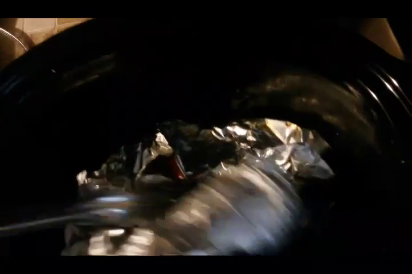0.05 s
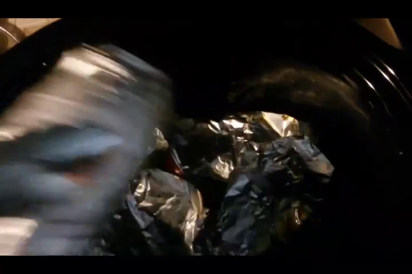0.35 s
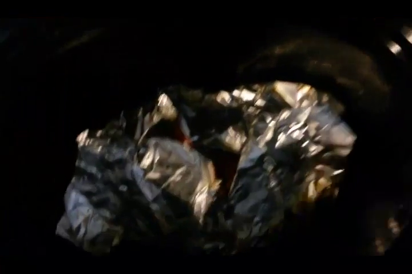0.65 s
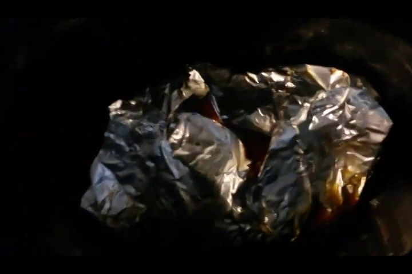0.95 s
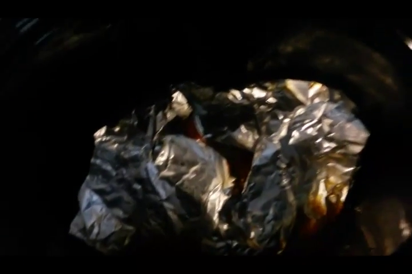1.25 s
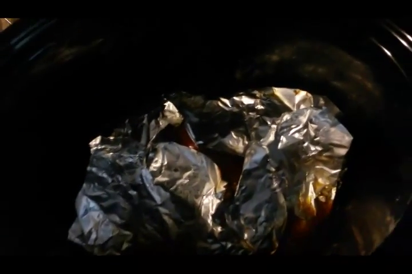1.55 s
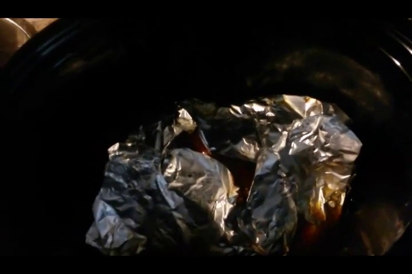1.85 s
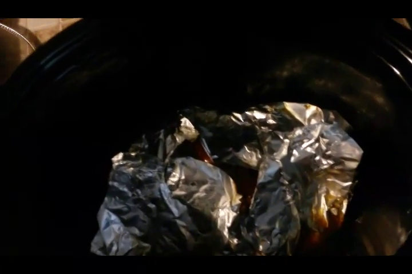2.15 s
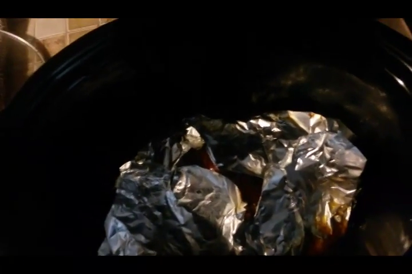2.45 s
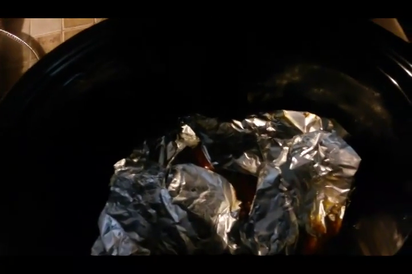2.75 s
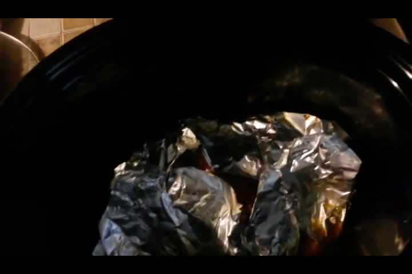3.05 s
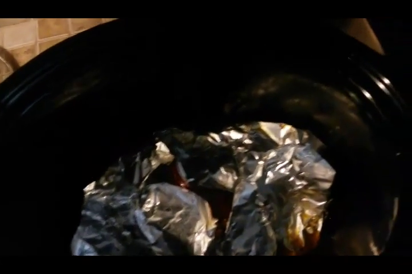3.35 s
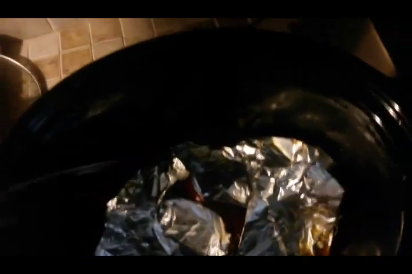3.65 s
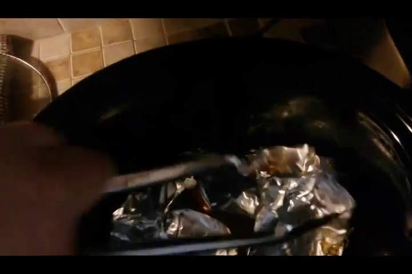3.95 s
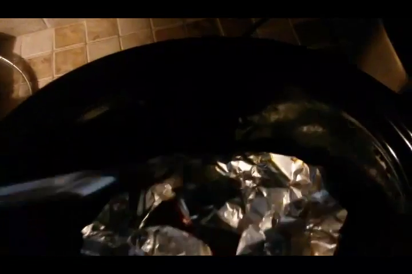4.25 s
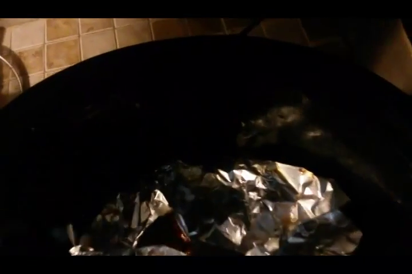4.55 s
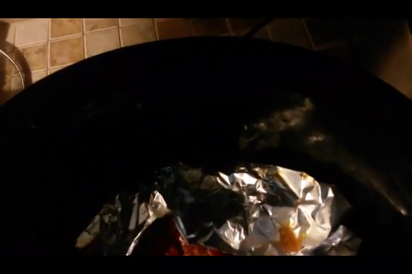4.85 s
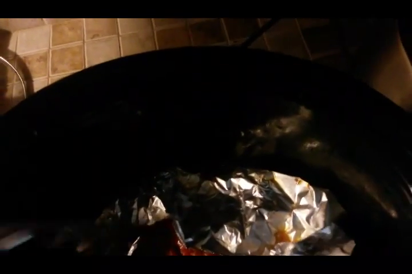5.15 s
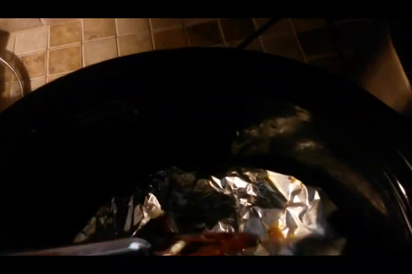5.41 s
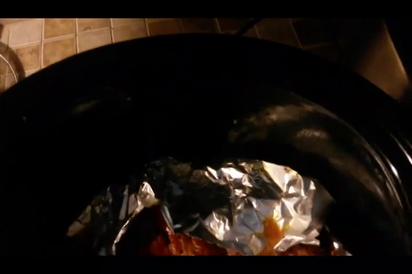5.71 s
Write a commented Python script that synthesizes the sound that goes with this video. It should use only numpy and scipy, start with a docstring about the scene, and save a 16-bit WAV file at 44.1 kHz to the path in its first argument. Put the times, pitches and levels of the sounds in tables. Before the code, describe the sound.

Close, crisp crackles of foil pushed by metal tongs come in bursts over faint bubbling and a low motor hum.

```python
"""Foil potatoes in a slow cooker

Metal tongs shift foil-wrapped potatoes: the foil buckles in thousands of tiny clicks that make short
rustles, snaps and hollow crunches. Juice simmers and spits faintly in the crock, which takes a dull
knock just after a much fainter one; a motor hums in the kitchen. The microphones are close over
the pot, the left one dull, the right one very bright."""
import sys
import numpy as np
from scipy import signal
from scipy.fft import rfft, irfft, next_fast_len
from scipy.io import wavfile
from scipy.ndimage import uniform_filter1d, minimum_filter1d, map_coordinates

SR = 44100
rng = np.random.default_rng(int(sys.argv[2]) if len(sys.argv) > 2 else 0)


def to_wav(s):
    """Save 16-bit WAV."""
    ch = np.atleast_2d(s).T  # columns
    pcm = np.round(np.clip(ch, -1, 1) * 32767)  # PCM
    wavfile.write(sys.argv[1], SR, pcm.astype(np.int16))


N = 263621

# the foil's three voices (fine creases, facets, the whole sheet): low_hz, high_hz
CREASE_HZ, FACET_HZ, SHEET_HZ = (7020, 14240), (2204, 5990), (704, 1980)

# shoves of the tongs: start_s, hold_s, level_db, facet_trim_db, sheet_trim_db
SHOVES = [(0, 0.065, -40.5, 0, -8), (0.131, 0.041, -29.5, -2.5, -14.5), (0.071, .2, -42.5, -2.5, -9),
          (.275, 0.092, -27.5, -7, -16.5), (.368, 0.019, -21, -13.5, -17.5), (0.59, .03, -37, -7, -14),
          (0.619, 0.019, -23, -8.5, -19), (1.188, 0.098, -35, -4, -26), (1.838, 0.04, -32.5, -1.5, -16),
          (3.332, 0.034, -19, -3, -43), (3.397, 0.059, -21, -11.5, -31), (4.191, 0.041, -39.5, -4.5, -16),
          (4.216, 0.034, -48, 2, 2.5), (4.245, 0.082, -23.5, -7.5, -15), (4.31, 0.094, -20, -10, -18),
          (4.824, .074, -31.5, -2.5, -11.5), (4.898, 0.088, -32, -9, -13.5), (5.122, 0.025, -40.5, -3, -9),
          (5.198, .056, -35.5, -9, -8.5), (5.502, 0.13, -38, -4.5, -10.5), (5.551, 0.03, -30.5, -5.5, -13),
          (5.636, 0.011, -32, -2.5, -8.5), (5.713, 0.014, -24, -12, -10), (5.752, 0.057, -23, -3.5, -8.5),
          (5.808, 0.15, -28.5, -6, -19.5)]
# gentle flexes of the foil: middle_s, half_width_s, level_db
FLEXES = [(1.42, 0.024, -43.5), (1.521, 0.028, -46.5), (1.645, 0.055, -44.5), (1.801, 0.046, -40),
          (1.91, .04, -48), (2.045, 0.041, -50), (2.13, 0.018, -38.5), (2.29, .04, -53), (2.41, 0.065, -38),
          (2.515, 0.042, -41.5), (2.675, 0.028, -40.5), (2.81, 0.044, -36), (2.95, 0.029, -35.5),
          (3.0, .025, -34), (3.149, 0.043, -35), (3.225, 0.022, -35), (3.314, 0.021, -33),
          (3.47, 0.035, -38), (5.171, 0.054, -46.5), (5.228, 0.02, -29.5)]
def foil_rustles(attack_s=0.0044, release_s=0.0075, settle_db=-19.5, settle_s=0.057):
    """A shove bites and lets go quickly, then the foil settles softly; a flex is one smooth swell."""
    out = np.zeros((2, N))
    t = np.arange(SR // 3) / SR
    for start_s, hold_s, level_db, facet_trim_db, sheet_trim_db in SHOVES:
        attack = np.minimum(t / attack_s, 1)
        after = np.maximum(t - hold_s, 0)
        fall = np.maximum(np.exp(-after / release_s), amp(settle_db) * np.exp(-after / settle_s))
        add(out, start_s, rustle(amp(level_db) * attack * fall, facet_trim_db, sheet_trim_db))
    t = np.arange(-SR // 6, SR // 6) / SR
    for middle_s, half_width_s, level_db in FLEXES:
        swell = amp(level_db) * np.exp(-0.5 * (t / half_width_s) ** 2)
        add(out, middle_s + t[0], rustle(swell, facet_trim_db=-3.5, sheet_trim_db=-16.5))
    return shifting_resonances(out)


def rustle(effort, facet_trim_db, sheet_trim_db, jerk_db=1.35, jerk_hz=90):
    """Foil gives way in small jerks: creases crackle, facets buckle and the sheet drags on the crock."""
    n = len(effort)
    creases = crackle(n, CREASE_HZ, per_s=3500, spread_db=2.9, cycles=0.8)
    facets = crackle(n, FACET_HZ, per_s=2200, spread_db=2.65, cycles=0.96)
    sheet = crackle(n, SHEET_HZ, per_s=1500, spread_db=2.5, cycles=0.42)
    foil = creases + amp(facet_trim_db - 2) * facets + amp(sheet_trim_db - 0.5) * sheet
    jerks = map_coordinates(rng.standard_normal(256), [np.arange(n) / SR * jerk_hz], mode="mirror")
    return foil * effort * amp(jerk_db * jerks)


def shifting_resonances(x, depth_db=2.5):
    """As foil changes shape its resonances come and go, in patches of about 600 Hz by 30 ms."""
    spectrum = signal.stft(x, nperseg=256)[2]
    patches = rng.standard_normal(spectrum.shape[1:])
    patches = uniform_filter1d(uniform_filter1d(patches, size=4, axis=0), size=11, axis=1)
    gain = amp(depth_db * patches / patches.std())
    gain /= np.sqrt(np.mean(gain ** 2))
    return signal.istft(spectrum * gain, nperseg=256)[1][:, :x.shape[1]]


# sharp snaps and faint ticks, the loud ones mostly brighter: start_s, level_db, body_db
SNAPS = [(.0034, -22, -3.5), (0.016, -20, -19), (0.1155, -15, -19), (0.2143, -25.5, -16),
         (0.2761, -10.5, -2), (.3745, -7, -27), (0.449, -17.5, -4), (0.507, -39.5, 5.5),
         (0.5901, -19.5, -9), (0.637, -14, -28), (0.8106, -35.5, -8), (1.3011, -15.5, -29),
         (1.47, -24, -29), (1.8414, -25, -8), (1.864, -19, -7.5), (1.8994, -20, -22), (2.0268, -33.5, 2),
         (2.1796, -24, 0), (2.311, -30, -17), (2.614, -28.5, -5.5), (2.891, -28.5, 0.5),
         (3.1403, -25, -0.5), (3.3307, -6, -6.5), (3.3494, -3, -28), (3.3995, 0, -15), (3.4495, -13, -12),
         (3.692, -35, -7), (3.9789, -46, 5.5), (4.2445, -19, -5), (4.2906, -12, -11), (4.3834, -23, -27),
         (4.4426, -22, -4), (4.826, -21, -3.5), (4.8825, -18, 2), (5.563, -13, -20), (5.6474, -12.5, -9),
         (5.7143, -12, -14), (5.7212, -14.5, -5), (5.7511, -4, -8.5), (5.7773, -10, -2.5), (5.794, -3, -28),
         (5.8048, -5.5, -23), (5.892, -22, -1)]
def foil_snaps(run_s=0.0008, lag_s=0.00086):
    """A fold gives way in an avalanche of eight buckles, a few milliseconds long."""
    out = np.zeros((2, N))
    for start_s, level_db, body_db in SNAPS:
        times = np.append(0, rng.exponential(run_s, 7))
        sizes = np.exp(-times / (2 * run_s))
        for band_hz, band_db in (CREASE_HZ, 0), (FACET_HZ, body_db - 2), (SHEET_HZ, body_db - 13):
            buckles = grains(SR // 16, times, sizes, band_hz, cycles=0.64)
            snap = in_pot(buckles[None], walls_db=0)
            add(out, start_s + lag_s, snap * amp(level_db + band_db) / np.abs(snap.mean(0)).max())
    return out


# hollow foil crunches and a few faint juice pops: start_s, level_db, pitch_hz, length_s
CRUNCHES_AND_POPS = [(0.274, -27.5, 1050, .006), (0.385, -30, 940, .008), (0.439, -37, 1550, 0.015),
                     (0.59, -29.5, 2890, .008), (0.617, -22.5, 2720, .025), (0.965, -42.5, 2370, .003),
                     (1.84, -29, 2990, 0.035), (2.612, -33.5, 2320, .004), (3.33, -13, 4870, .028),
                     (3.356, -20.5, 2580, .02), (3.402, -24.5, 2690, 0.05), (3.6, -42, 2460, .003),
                     (4.289, -10, 6650, .005), (4.341, -26.5, 980, .01), (4.573, -45.5, 2480, .004),
                     (4.871, -25, 3020, 0.014), (4.933, -24, 3040, 0.007), (5.129, -37, 1465, .025),
                     (5.625, -32.5, 1560, .027), (5.749, -23, 1730, .008), (5.939, -21, 7200, .005)]
def crunches_and_pops(pitch_spread=0.089, clicks_per_s=1500, trim_db=-1):
    """Clicks ring near one pitch: a taut foil panel crunching or, when tiny and faint, a juice pop."""
    out = np.zeros((2, N))
    for start_s, level_db, pitch_hz, length_s in CRUNCHES_AND_POPS:
        times = length_s * rng.random(int(clicks_per_s * length_s) + 1)
        band_hz = pitch_hz * (1 - pitch_spread), pitch_hz * (1 + pitch_spread)
        clicks = grains(SR // 8, times, np.ones(len(times)), band_hz, cycles=2.1, grain_samples=512)
        ring = in_pot(clicks[None])
        add(out, start_s, ring * amp(level_db + trim_db) / np.abs(ring.mean(0)).max())
    return out


# dull blows on the crock: start_s, level_db, cutoff_hz
KNOCKS = [(1.968, -39, 380), (2.323, -25.5, 1800)]
# modes of the loaded crock: pitch_hz, level_db, t60_s
CROCK_MODES = [(141.5, -6, 0.26), (288, 1, 0.11), (451, -2.5, 0.16), (610, -23, 0.06), (909, -6, 0.13),
               (1120, 1.5, 0.041), (1340, -6, 0.022)]
def crock_knocks(ring_db=-0.5, thud_db=-9, thud_t60_s=0.1):
    """A soft blow thuds and briefly rings the heavy crock; the softer the contact, the duller."""
    out, t = np.zeros((2, N)), np.arange(SR // 5) / SR
    for start_s, level_db, cutoff_hz in KNOCKS:
        modes = sum(amp(db - 60 * t / t60_s) * np.sin(2 * np.pi * (hz * t + rng.random()))
                    for hz, db, t60_s in CROCK_MODES)
        soften = signal.butter(5, [130, cutoff_hz], "band", fs=SR, output="sos")
        ring = signal.sosfilt(soften, modes)
        thud = unit_rms(signal.sosfilt(soften, rng.standard_normal((2, len(t)))))
        thud *= amp(thud_db - 60 * t / thud_t60_s)
        add(out, start_s, amp(level_db) * (amp(ring_db) * ring / np.abs(ring).max() + thud))
    return out


# the larger bubbles in the juice: start_s, level_db, pitch_hz
BUBBLES = [(0.575, -39, 550), (0.773, -42, 557), (1.046, -42, 590), (1.131, -40.5, 573), (1.753, -41, 1120),
           (2.765, -38, 574), (3.013, -33.5, 1160), (3.225, -35, 850), (3.841, -48, 541), (4.115, -47, 586),
           (4.518, -39, 620), (4.542, -41, 1080), (4.646, -44.5, 414), (5.336, -41, 654), (5.403, -41, 567)]
def juice_bubbles(life_s=0.0011, rise_per_s=12, tick_db=-2):
    """A bubble's skin bursts with a tick; the pocket under it plops, rising a little in pitch."""
    out, t = np.zeros((2, N)), np.arange(SR // 25) / SR
    envelope = t / life_s * np.exp(1 - t / life_s)
    for start_s, level_db, pitch_hz in BUBBLES:
        plop = envelope * np.sin(2 * np.pi * pitch_hz * t * (1 + rise_per_s * t / 2))
        burst = grains(len(t), np.zeros(1), np.ones(1), (1.7 * pitch_hz, 2 * pitch_hz), cycles=0.43)
        tick = in_pot(burst[None])
        add(out, start_s, amp(level_db) * (plop + amp(tick_db) * tick / np.abs(tick).max()))
    return out


# tone of the kitchen hiss: frequency_hz, gain_db
HISS_TONE = [(100, 16), (300, 14.5), (620, -2.5), (900, -1), (1400, -8.5), (2500, -12), (5000, -11.5),
             (10000, -22), (15000, -25)]
def simmer(hiss_db=-5, spit_db=-7, pop_db=-13, plop_db=-12):
    """Tiny spits, pops and plops from the hot juice, in a soft kitchen hiss."""
    hiss = unit_rms(microphones(shaped_noise(HISS_TONE)))
    spits = crackle(N, (3000, 14000), per_s=70, spread_db=4.6, cycles=0.13, spots=2)
    pops = crackle(N, (1300, 3600), per_s=55, spread_db=4.6, cycles=0.8, spots=1)
    plops = crackle(N, (430, 800), per_s=40, spread_db=2, cycles=0.45, spots=1)
    bed = amp(hiss_db) * hiss + amp(spit_db) * spits + amp(pop_db) * pops + amp(plop_db) * plops
    return bed * background_gain()


# harmonics of the hum: shaft_multiple, level_db
HUM_ORDERS = [(3, -24), (4, -19), (5, -10.5), (6, -16.5), (7, -12.5), (8, 0.5), (9, -11.5), (10, -8.5),
              (11, -10), (12, -12.5), (13, -66)]
# thin whine: pitch_hz, level_db
WHINE = [(731, -45), (1568, -26), (1985, -25)]
# tone of the rumble: frequency_hz, gain_db
RUMBLE_TONE = [(20, -23), (35, -21), (65, 2), (130, 4.5), (220, 4.5), (330, 1), (450, -16), (900, -19),
               (2000, -81)]
def motor(shaft_hz=28.28, rumble_db=-7, rumble_width=0.62):
    """The motor's harmonics, nearly in step, pile into one throb a turn, with a whine and a rumble."""
    t = np.arange(N) / SR
    throb = sum(amp(db) * np.cos(2 * np.pi * k * shaft_hz * t + rng.random()) for k, db in HUM_ORDERS)
    whine = sum(amp(db) * np.sin(2 * np.pi * hz * t) for hz, db in WHINE)
    hum = np.sqrt(2) * (throb + whine) * amp([[-1.2], [1]])  # leans right
    mid, side = shaped_noise(RUMBLE_TONE)
    side = rumble_width * filtered(side, lambda hz: 1 / np.hypot(1, hz / 130))  # wide in the lows
    rumble = unit_rms(np.array([mid + side, mid - side])) * amp([[1], [-1]])  # leans left
    return (hum + amp(rumble_db) * rumble) * background_gain()


# fader for the background bed: time_s, level_db
BACKGROUND_FADER = [(0, -55), (1.25, -53), (1.95, -49.5), (2.45, -52.5), (3.15, -46.5), (3.31, -46),
                    (3.45, -52), (4.05, -59.5), (4.7, -55.5), (5.98, -49)]
def background_gain():
    """Simmer and motor swell and fade together as the microphones move over the pot."""
    time_s, level_db = np.transpose(BACKGROUND_FADER)
    return amp(np.interp(np.arange(N) / SR, time_s, level_db))


# decay of the kitchen: frequency_hz, t60_s
KITCHEN_DECAY = [(200, 0.22), (2500, 0.26), (10000, 0.2), (15000, 0.11)]
def kitchen_reverb(x):
    """The tiled kitchen answers after 10 ms; each frequency dies at its own speed."""
    hz, t, noise = signal.stft(rng.standard_normal((2, SR // 2)), SR, nperseg=256)
    decay = amp(-60 * t / along(KITCHEN_DECAY, hz)[:, None])
    tail = signal.istft(noise * decay, SR, nperseg=256)[1]
    tail = np.pad(tail / np.linalg.norm(tail[0]), ((0, 0), (SR // 100, 0)))
    return signal.fftconvolve(x, tail, axes=1)[:, :N]


def in_pot(spots, t60_s=0.028, walls_db=-2, stereo_above_hz=1300):
    """Each spot (one row) reaches the microphones directly and by quick echoes off the glazed walls."""
    t = np.arange(SR // 30) / SR
    mid, side = rng.standard_normal((2, len(spots), len(t))) * amp(-60 * t / t60_s)
    # long waves reach both microphones alike
    side = signal.lfilter(*signal.butter(1, stereo_above_hz, "high", fs=SR), side)
    paths = np.array([mid + side, mid - side])
    paths *= amp(walls_db) / np.linalg.norm(paths, axis=-1, keepdims=True)
    paths[0, :, SR // 3900] += 1  # direct sound: the left microphone is farther away
    paths[1, :, 0] += 1
    arrivals = signal.oaconvolve(spots[None], paths, axes=2).sum(1)
    return microphones(arrivals[:, :spots.shape[1]])


# tone of each microphone over the pot: frequency_hz, gain_db
LEFT_TONE = [(200, -14), (500, -6.5), (1000, -3), (1600, 4.5), (2300, 8), (3600, 2.5), (4700, 8),
             (6000, -2), (8000, -6), (10000, -16), (12500, -11.5), (14500, -13.5)]
RIGHT_TONE = [(200, -11), (500, -2), (1000, -2), (1600, 2.5), (2300, -0.5), (3100, 3.5), (4100, -8.5),
              (5000, 1), (8000, 8), (9400, 10.5), (10500, 17.5), (12200, 9.5), (14500, 6)]
def microphones(x, taps=512):
    """Each microphone colours the sound: dull on the left, bright on the right."""
    hz = np.fft.rfftfreq(taps, 1 / SR)
    cepstrum = irfft(np.log(amp([along(LEFT_TONE, hz), along(RIGHT_TONE, hz)])))
    cepstrum[:, 1:taps // 2] *= 2  # minimum phase: nothing rings ahead of a click
    cepstrum[:, taps // 2 + 1:] = 0
    impulse = irfft(np.exp(rfft(cepstrum)))
    return signal.fftconvolve(x, impulse, axes=1)[:, :x.shape[1]]


def crackle(n, band_hz, per_s, spread_db, cycles, spots=5):
    """n samples of clicks from spots in the pot, mostly small and a few large, at rms 1."""
    draws = rng.random((int(per_s * n / SR / spots) + 1, spots, 2)).transpose(1, 2, 0)
    streams = []
    for when, chance in draws:
        sizes = amp(spread_db * np.minimum(-np.log(1 - chance), 3.6))
        streams.append(grains(n, when * n / SR, sizes, band_hz, cycles))
    return unit_rms(in_pot(np.array(streams)))


def grains(n, times, sizes, band_hz, cycles, grain_samples=256):
    """Tiny clicks in n samples: each rings at its own pitch, peaks after `cycles` and dies away."""
    t = np.arange(grain_samples) / SR
    place_in_band, phase = rng.random((len(times), 2)).T[..., None]
    hz = band_hz[0] + place_in_band * (band_hz[1] - band_hz[0])
    age = t * hz / cycles
    waves = sizes[:, None] * np.sqrt(hz) * age * np.exp(-age) * np.sin(2 * np.pi * (hz * t + phase))
    where = (times[:, None] * SR).astype(int) + np.arange(grain_samples)
    return np.bincount(where.ravel(), waves.ravel(), n)[:n]


def amp(db):
    """Decibels to gain."""
    return 10 ** (np.asarray(db) / 20)


def unit_rms(x):
    """Scale a stereo pair so that its mid signal has rms 1."""
    return x / np.sqrt(np.mean(x.mean(0) ** 2) + 1e-20)


def along(points, hz):
    """Read (frequency_hz, value) points on a log frequency axis."""
    point_hz, values = np.transpose(points)
    return np.interp(np.log(hz + 1), np.log(point_hz), values)


def filtered(x, response):
    """Equalise x with a gain that is a function of frequency."""
    size = next_fast_len(N + SR // 4)
    return irfft(rfft(x, size) * response(np.fft.rfftfreq(size, 1 / SR)), size)[..., :N]


def shaped_noise(tone):
    """Two independent noises with the same tone curve."""
    return filtered(rng.standard_normal((2, N)), lambda hz: amp(along(tone, hz)))


def add(track, start_s, sound):
    """Mix a sound into a track."""
    part = track[..., max(round(start_s * SR), 0):][..., :sound.shape[-1]]
    part += sound[..., :part.shape[-1]]


def gain_control(x, threshold_db=-25, squeeze=0.35, hold_s=0.053):
    """Automatic gain ducks everything for a moment when a crinkle is loud."""
    power = np.abs(uniform_filter1d((x ** 2).max(0), size=SR // 100))
    gain_db = -squeeze * np.maximum(10 * np.log10(power + 1e-12) - threshold_db, 0)
    span = int(hold_s * SR)
    held_db = minimum_filter1d(gain_db, span, origin=(span - 1) // 2)
    return x * amp(uniform_filter1d(held_db, size=SR // 200))


def scene(reverb_db=-14):
    """The pot's sounds in the kitchen, over the motor."""
    pot = foil_rustles() + foil_snaps() + crunches_and_pops()
    pot = pot + juice_bubbles() + crock_knocks() + simmer()
    return pot + amp(reverb_db) * kitchen_reverb(pot) + motor()


def record(dry, ceiling=0.8, top_hz=14850):
    """Ride the gain, round off the tallest peaks and cut the extreme treble steeply."""
    ridden = gain_control(dry)
    rounded = ridden / (1 + (ridden / ceiling) ** 4) ** (1 / 4)
    return filtered(rounded, lambda hz: 1 / np.hypot(1, (hz / top_hz) ** 70))


dry = scene()
out = record(dry)
to_wav(out)
```